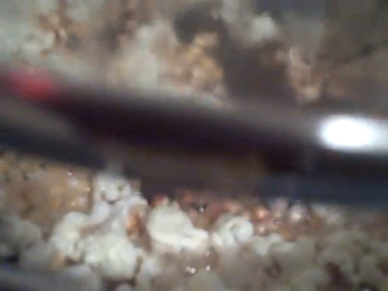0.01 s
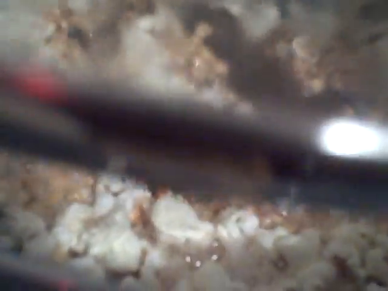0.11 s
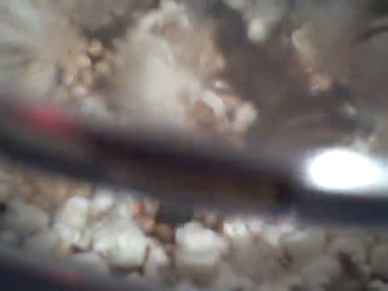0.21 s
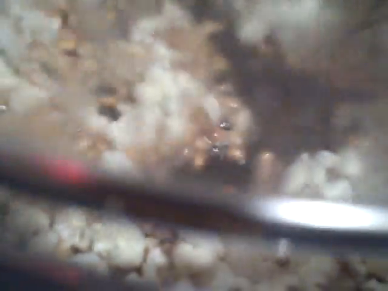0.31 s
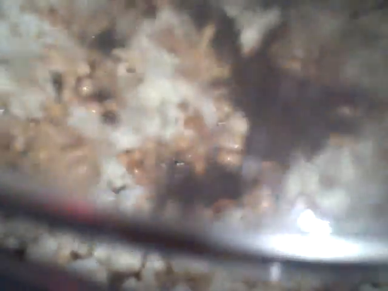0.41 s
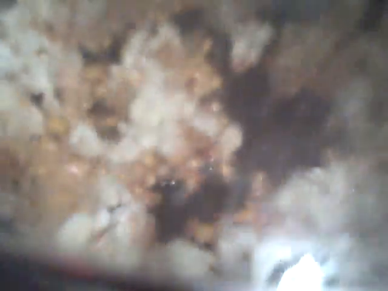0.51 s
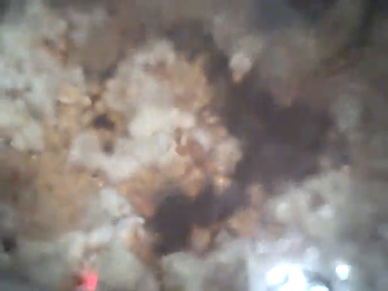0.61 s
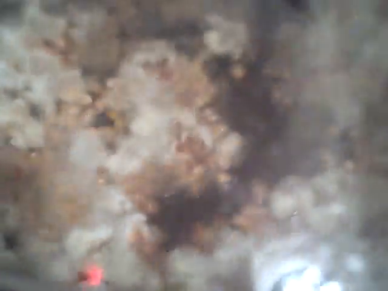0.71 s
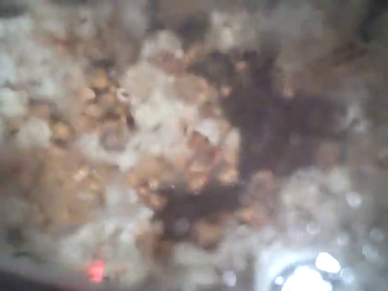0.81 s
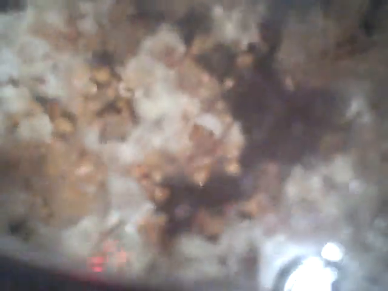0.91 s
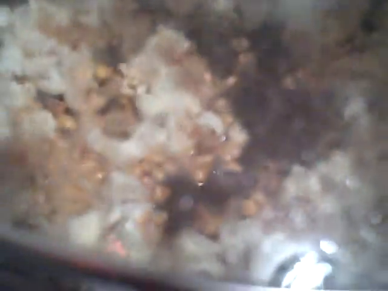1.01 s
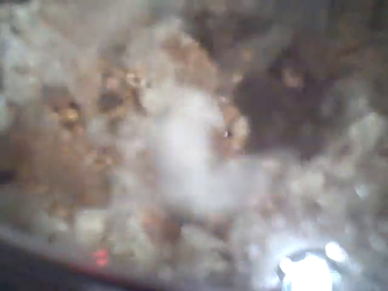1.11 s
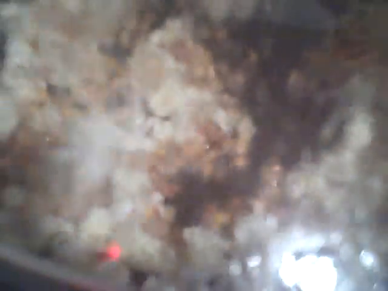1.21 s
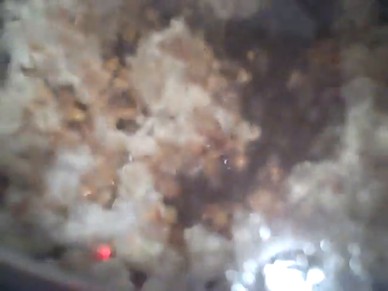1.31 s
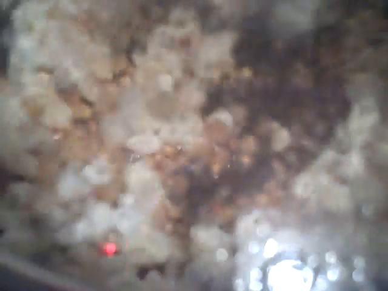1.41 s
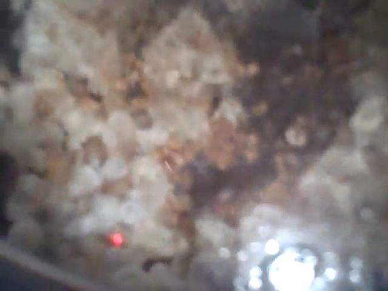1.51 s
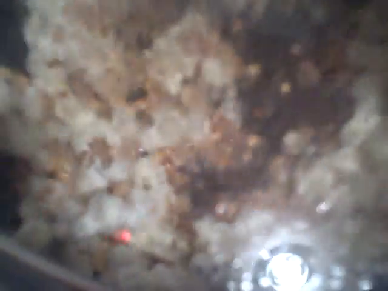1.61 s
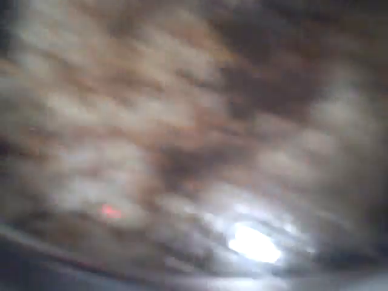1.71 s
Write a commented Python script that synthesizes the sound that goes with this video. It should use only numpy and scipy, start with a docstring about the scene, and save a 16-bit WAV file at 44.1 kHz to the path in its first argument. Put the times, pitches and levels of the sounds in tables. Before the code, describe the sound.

Popcorn pops in a metal pan, very close: faint sizzle and light ticks, two loud thumping pops, a lull, more pops with kernels pinging on metal, then lid knocks and rattle, in a small kitchen.

```python
"""A faint sizzle of oil and a few light ticks of kernels on metal come first, then popcorn bursts in a pan.
Close to the microphone, each pop sums a swinging thump, noise bursts for hull and steam, and ringing modes.
Flung kernels tick on the pan as short noise bands with a ring; after the last pop the lid knocks and rattles.
Behind them a hum falls in pitch, filtered noise makes sizzle and rumble, and the kitchen adds a short tail.
The microphone overloads on the loudest pops and loses the extreme top."""
import sys
import numpy as np
from scipy import signal
from scipy.fft import rfft, irfft
from scipy.io import wavfile

SR = 44100
rng = np.random.default_rng(int(sys.argv[2]) if len(sys.argv) > 2 else 0)


def materialize(psi):
    """Save the field psi as 16-bit PCM at rate SR to the path in sys.argv[1].

    A 1-D psi becomes a single channel; in a 2-D psi each row is a channel.
    """
    bounded = np.clip(np.atleast_2d(psi).T, -1, 1)
    quanta = np.round(bounded * 32767).astype(np.int16)
    wavfile.write(sys.argv[1], SR, quanta)


N = 79380
T = np.arange(N) / SR


def amp(db):
    """Decibels to gain."""
    return 10 ** (np.asarray(db) / 20)


def fade(t60):
    """Exponential decay by 60 dB in t60 seconds."""
    return np.exp(-np.log(1000) * T / t60)


def add(out, start_s, x):
    """Mix x into out from start_s on."""
    i = int(np.clip(start_s * SR, 0, N - 1))
    out[i:] += x[:N - i]


def pulse(width_s):
    """A push that peaks early, then swings back through zero."""
    t = T / width_s
    return t * np.exp(1 - t) * (1 - t / 2)


CLICK_RISE_S = 0.0002
CONTACT_DB, CONTACT_S = -2.5, 0.00031  # the hard first instant of a click


def burst(hz, octaves, t60):
    """A band of noise that starts sharply and dies away, levelled to a set energy for its t60."""
    edges = hz * 2 ** (np.array([-.5, .5]) * octaves)
    edges = np.clip(edges, [20, 40], [15000, 20000])
    sos = signal.butter(2, edges, "band", fs=SR, output="sos")
    shape = fade(t60) + amp(CONTACT_DB) * np.exp(-T / CONTACT_S)
    shape *= 1 - np.exp(-T / CLICK_RISE_S)
    x = signal.sosfilt(sos, rng.standard_normal(N) * (shape + 1e-12))
    return x * np.sqrt(2 * np.sum(fade(t60) ** 2) / np.sum(x ** 2))


def treble(t60):
    """The bright spray on top of a click: noise two octaves wide."""
    return burst(6900 * np.sqrt(2), 2, t60)


RING_OCTAVES = 0.22
SPLIT_HZ, TWIN_DB = 6.5, -6  # typical (random) distance and the level of each mode's close twin


def ring(modes, hz=None, octaves=RING_OCTAVES):
    """Half a second of decaying, beating modes, mixed anew by each blow; those near hz are favoured."""
    out, t = np.zeros(N), T[:SR // 2]
    draws = rng.standard_normal((len(modes), 4))
    for (f, db, t60), (size_db, phase, split, twin_phase) in zip(modes, draws):
        weight = 1 if hz is None else 1 / np.hypot(1, np.log2(f / hz) / octaves)
        main = np.sin(2 * np.pi * (f * t + phase))
        twin = amp(TWIN_DB) * np.sin(2 * np.pi * ((f + SPLIT_HZ * split) * t + twin_phase))
        decay = np.exp(-np.log(1000) * t / t60)
        out[:len(t)] += weight * amp(db + size_db) * (main + twin) * decay
    return out


RUMBLE_DB, RUMBLE_HZ = -57.5, 113


def rumble():
    """Low steady noise of the kitchen: noise kept below a corner frequency."""
    x = signal.sosfilt(signal.butter(2, RUMBLE_HZ, fs=SR, output="sos"), rng.standard_normal(N))
    return amp(RUMBLE_DB) * x / x.std()


ROOM_DB, ROOM_T60_S, ROOM_TOP_HZ = -21, 0.37, 8100


def kitchen(x):
    """The short, slightly dull room tail: convolution with dying noise."""
    soft = signal.butter(1, ROOM_TOP_HZ, fs=SR)
    tail = signal.lfilter(*soft, rng.standard_normal(N))
    tail *= fade(ROOM_T60_S) * (1 - np.exp(-T / 0.0015))
    return signal.fftconvolve(x, tail / np.sqrt(np.sum(tail ** 2)))[:N]


# colour of the sizzle and kitchen air: (frequency [Hz], relative level [dB per Hz])
AIR_COLOUR = [(30, -1.5), (80, -1), (180, -17), (360, -1.5), (650, -14), (2000, -10.5), (5500, -13.5),
              (10000, -19.5), (16000, -14.5)]
# level of the sizzle: (time [s], level [dB])
SIZZLE_LEVEL = [(0, -44), (.15, -47), (.6, -53), (.73, -51), (1.05, -48.5), (1.6, -50), (1.8, -59.5)]
SPIT_PER_S, SPIT_HZ, SPIT_T60_S = 70, 8000, .012
SPIT_DB, SPIT_SPREAD_DB = -5, 4  # smallest spit relative to the hiss, and the scale of its random excess


def sizzle():
    """Hot oil, faint in the pan: coloured noise with tiny spits at random times."""
    hz, db = np.array(AIR_COLOUR).T
    bins_hz = np.arange(N // 2 + 1) * SR / N
    colour = amp(np.interp(np.log(bins_hz + 1), np.log(hz), db))
    hiss = irfft(rfft(rng.standard_normal(N)) * colour, N)
    spits = np.zeros(N)
    for place, size, pitch in rng.random((int(SPIT_PER_S * N / SR), 3)):
        spit = burst(SPIT_HZ * 2 ** (pitch - .5), 1.4, SPIT_T60_S)
        excess_db = SPIT_SPREAD_DB * min(-np.log(1 - size), 3)
        add(spits, place * N / SR, amp(SPIT_DB + excess_db) * spit)
    times, level_db = np.array(SIZZLE_LEVEL).T
    return amp(np.interp(T, times, level_db)) * (hiss / hiss.std() + spits)


# the air in the pan, falling in pitch: (time [s], frequency [Hz], hum level relative to the thumps [dB])
AIR_IN_PAN = [(0.398, 373, -37.5), (1.198, 340.7, -31), (1.381, 299.2, -10.5), (1.551, 160, -20)]
HUM_T60_S, HUM_WIDTH_HZ = 0.4, 21


def hum():
    """An uneven hum lingers after each pop: slow noise carried on the pitch of the air in the pan."""
    times, hz, db = np.array(AIR_IN_PAN).T
    power = np.zeros(N)
    for start_s, thump_db, *_ in BURSTS:
        add(power, start_s, (amp(thump_db) * fade(HUM_T60_S)) ** 2)
    slow = signal.butter(2, HUM_WIDTH_HZ, fs=SR, output="sos")
    a, b = signal.sosfilt(slow, rng.standard_normal((2, N)))
    phase = 2 * np.pi * np.cumsum(np.interp(T, times, hz)) / SR
    wander = (a * np.cos(phase) + b * np.sin(phase)) / a.std()
    return np.sqrt(power) * amp(np.interp(T, times, db)) * wander


RATTLE_HZ, RATTLE_T60_S = 560, .15
RATTLE_GRAIN_S, RATTLE_GRAIN_DB = 0.0036, 9


def rattle():
    """Loose corn jolted by a knock: low noise in short uneven grains."""
    sizes = amp(RATTLE_GRAIN_DB * np.clip(rng.standard_normal(N), -2, 2))
    grain = (T / RATTLE_GRAIN_S).astype(int)
    return burst(RATTLE_HZ, 3.13, RATTLE_T60_S) * sizes[grain]


BOOM_T60_S, BOOM_RISE_S = 0.078, 0.0021
BOOM_NOISE_DB, BOOM_NOISE_RATIO, BOOM_NOISE_T60_S = -15, 0.87, .2


def boom(hz):
    """The low note of a knock: a decaying sine with noise just below it."""
    x = np.sin(2 * np.pi * hz * T) * fade(BOOM_T60_S)
    x += amp(BOOM_NOISE_DB) * burst(hz * BOOM_NOISE_RATIO, 1.5, BOOM_NOISE_T60_S)
    return x * (1 - np.exp(-T / BOOM_RISE_S))


# modes of the lid: (frequency [Hz], level [dB], t60 before any damping by hand [s])
LID_RESONANCES = [(722, 3, 0.09), (806, -5.5, 0.77), (1084, 6, 0.015), (1266, -15, 0.6), (1396, -9, 0.27),
                  (1765, -6.5, 0.19), (2090, -10, 0.16), (3220, 1, 0.045), (3880, 2, 0.06)]
# kernels glancing off the lid: (time [s], lid ring level [dB], favoured frequency [Hz])
LID_TOUCHES = [(.7694, -37.5, 820), (.8955, -24, 1370), (1.1592, -30, 829), (1.31, -23.5, 1274)]
# lid knocks: (time [s], clank level [dB], clank frequency [Hz], boom level [dB], boom frequency [Hz],
#   lid ring level [dB])
LID_KNOCKS = [(1.3793, -19, 1800, -13.5, 311, -22.5), (1.4838, -27, 2530, -14.5, 233, -30),
              (1.5195, -16, 1620, -17, 152, -31.5), (1.5325, -24, 1570, -21, 202, -38),
              (1.5495, -29, 1360, -28, 152, -38), (1.578, -45, 980, -27.5, 140, -65)]
TAP_OCTAVES, LID_HELD_T60_S = 0.071, 0.44  # a tap wakes few modes; the hand damps the lid while it knocks
CLANK_T60_S, CLANK_OCTAVES = 0.03, 2.1
CLANK_TREBLE_DB, SNAP_DB, SNAP_S, RATTLE_DB = -28, 15, 0.0002, -16  # levels relative to the clank


def lid():
    """The lid rings when kernels touch it, then knocks with a snap, a clank, a boom and a rattle."""
    out, snap = np.zeros(N), -pulse(SNAP_S)
    for start_s, db, hz in LID_TOUCHES:
        add(out, start_s, amp(db) * ring(LID_RESONANCES, hz, TAP_OCTAVES))
    for start_s, clank_db, hz, boom_db, boom_hz, ring_db in LID_KNOCKS:
        clank = burst(hz, CLANK_OCTAVES, CLANK_T60_S)
        clank += amp(CLANK_TREBLE_DB) * treble(CLANK_T60_S)
        clank += amp(SNAP_DB) * snap + amp(RATTLE_DB) * rattle()
        metal = fade(LID_HELD_T60_S) * ring(LID_RESONANCES, hz, octaves=1.6)
        add(out, start_s, amp(clank_db) * clank + amp(boom_db) * boom(boom_hz) + amp(ring_db) * metal)
    return out


# modes of the pan: (frequency [Hz], ring level [dB], t60 before the corn damps it [s])
PAN_RESONANCES = [(1146.6, -1, 0.43), (1706, -9.5, 0.065), (1780, -2.5, 0.14), (2179, -3, 0.12),
                  (2813, -13.5, 0.08), (2876, -2.5, 0.07), (3153, -11.5, 0.09), (3433, -6.5, .089),
                  (4130, -5.5, .055), (4900, -13.5, 0.42), (5285, -8, 0.088), (5850, -10, 0.075)]
RING_DAMP_T60_S, RING_FREE_DB = 0.082, -24  # the corn soaks up most of the ring; a little stays free


def pan_ring(hz):
    """The metal of the pan rings, quickly damped by the corn."""
    return (fade(RING_DAMP_T60_S) + amp(RING_FREE_DB)) * ring(PAN_RESONANCES, hz)


BODY_DB, BODY_DRY_DB, BODY_WIDTH_HZ = -5.5, -0.5, 103


def body(x):
    """Clicks are heard through the pan: equal resonant peaks at its modes, beside the plain click."""
    peaks = sum(signal.lfilter(*signal.iirpeak(f, f / BODY_WIDTH_HZ, fs=SR), x) for f, _, _ in PAN_RESONANCES)
    return amp(BODY_DRY_DB) * x + amp(BODY_DB) * peaks


THUMP_RISE_S, THUMP_T60_S = 0.001, 0.048
THUD_DB, THUD_RATIO, THUD_T60_S = -14.5, 0.821, 0.051  # a lower swing under the thump
HOLLOW_DB, HOLLOW_HZ = -24, 860  # the hollow knock within each thump
PUFF_DB, PUFF_S = -8.5, 0.00069  # the push of steam under each thump


def thump(hz):
    """A push of steam sets the air in the pan swinging for a few cycles, with a hollow knock."""
    swing = np.sin(2 * np.pi * hz * T) * fade(THUMP_T60_S)
    swing += amp(THUD_DB) * np.sin(2 * np.pi * hz * THUD_RATIO * T) * fade(THUD_T60_S)
    swing *= 1 - np.exp(-(T / THUMP_RISE_S) ** 2)
    hollow = burst(HOLLOW_HZ, 0.68, THUMP_T60_S)
    return -swing + amp(HOLLOW_DB) * hollow - amp(PUFF_DB) * pulse(PUFF_S)


# kernels hitting the pan: (time [s], tick level [dB], tick frequency [Hz], tick width [octaves],
#   treble level [dB], t60 [s], pan ring level [dB], favoured ring frequency [Hz], thud level [dB])
KERNEL_HITS = [(.061, -35, 4360, 1.5, -42, 0.0095, -47, 2200, -54.5),
               (.191, -25, 3100, 2.35, -50, 0.051, -28, 2230, -28.5),
               (.199, -21.5, 2130, 0.79, -29.5, 0.042, -20, 1840, -20.5),
               (0.2494, -21, 3850, 1.3, -28.5, 0.031, -13.5, 4230, -20),
               (.271, -21, 3800, 6.8, -36, 0.026, -22.5, 1800, -31),
               (0.2738, -11.5, 4350, 1.06, -32, 0.0089, -40, 4250, -34),
               (.365, -44, 5000, 1.1, -54, 0.052, -67, 2900, -47),
               (.409, -18.5, 4000, 2.6, -47, 0.063, -19.5, 2800, -38),
               (.412, -18.5, 6200, 0.36, -21, 0.018, -14, 5950, -57),
               (.428, -21, 3500, 1.2, -22, 0.025, -18, 1860, -21.5),
               (.553, -41.5, 7900, .54, -68, 0.063, -56, 5700, -59),
               (0.564, -40, 5770, 0.39, -56.5, 0.035, -73.5, 5700, -100),
               (0.583, -42.5, 5520, 0.35, -45, 0.085, -69, 5306, -83),
               (.663, -49, 6040, 0.92, -46, .05, -70, 5580, -64),
               (0.7691, -10, 4020, 1.57, -16.5, 0.046, -11, 2120, -11),
               (.796, -22.5, 5200, .3, -29, .03, -12, 5350, -26.5),
               (.8839, -27, 4020, 0.92, -42, .028, -20.5, 4000, -45),
               (.8954, -22, 2870, 1.7, -47, 0.056, -31, 2220, -50),
               (.947, -37, 3980, 3, -39, 0.043, -40, 2900, -26),
               (.969, -26.5, 5600, 0.87, -42, 0.015, -53, 5700, -28),
               (1.005, -59, 4440, 1.7, -55, 0.029, -61, 4200, -28),
               (1.1593, -24, 4540, 1.2, -48.5, 0.013, -17.5, 3950, -23.5),
               (1.234, -35, 7300, 0.45, -36, 0.082, -22.5, 4660, -53),
               (1.2551, -20.5, 3520, 2.7, -21.5, 0.015, -18.5, 1130, -61),
               (1.2585, -23, 3960, 1.3, -27, 0.021, -15.5, 2230, -51),
               (1.267, -24, 3300, 3.4, -31.5, 0.064, -23, 4070, -24),
               (1.287, -27, 5160, 1.5, -21.5, .019, -20.5, 4070, -27.5),
               (1.3286, -27, 4400, 1.7, -51, 0.057, -21.5, 4930, -32),
               (1.3301, -20.5, 7700, .26, -48, 0.01, -40, 5700, -48),
               (1.5988, -22, 4080, 0.93, -40.5, 0.031, -25.5, 4050, -54),
               (1.688, -39, 6410, 0.91, -59, .036, -36.5, 4840, -40)]


def ticks():
    """Flung kernels strike the pan: a hard tick, a short ring and a small thud at the pitch of its air."""
    out, clicks = np.zeros(N), np.zeros(N)
    times, air_hz, _ = np.array(AIR_IN_PAN).T
    for start_s, db, hz, octaves, treble_db, t60, ring_db, ring_hz, thud_db in KERNEL_HITS:
        add(clicks, start_s, amp(db) * burst(hz, octaves, t60))
        spray = amp(treble_db) * treble(t60)
        metal = amp(ring_db) * pan_ring(ring_hz)
        thud = amp(thud_db) * thump(np.interp(start_s, times, air_hz))
        add(out, start_s, spray + metal + thud)
    return out + body(clicks)


# short resonances of the corn-filled pan, the bark of each burst: (frequency [Hz], level [dB], t60 [s])
BARK_RESONANCES = [(2705, -2, 0.021), (3000, 3, 0.025), (3295, -10.5, 0.021), (3472, -1, 0.039),
                   (4050, -10.5, 0.11), (5040, -14, 0.017)]
# bursts: (time [s], thump level [dB], thump frequency [Hz], crack level [dB], crack frequency [Hz],
#   bark level [dB], favoured bark frequency [Hz], steam hiss level [dB], pan ring level [dB],
#   favoured ring frequency [Hz])
BURSTS = [(0.3275, 3, 369.4, -14, 2530, -12.5, 2700, -15.5, -16, 1260),
          (0.4018, -2.5, 375, -17, 3660, -10, 2830, -21.5, -20.5, 2200),
          (0.7557, -3, 357, -19, 4300, -11.5, 2980, -16, -17.5, 1200),
          (0.9234, -12.5, 353, -24, 3300, -10.5, 3010, -28, -13.5, 1900),
          (1.1193, -6.5, 349, -19.5, 4550, -15.5, 4500, -42.5, -18, 1400),
          (1.2002, -8, 349, -14, 4650, -14, 3150, -23.5, -15.5, 1710),
          (1.25, -13, 333, -19.5, 3150, -15.5, 3600, -35, -23, 1210)]
CRACK_LAG_S, CRACK_T60_S, CRACK_OCTAVES, BARK_OCTAVES = .0007, 0.029, 1.34, 0.12


def pops():
    """Bursting kernels: a thump, then at once the hull crack, bark, steam hiss and ringing pan."""
    out, cracks = np.zeros(N), np.zeros(N)
    for start_s, thump_db, thump_hz, crack_db, crack_hz, bark_db, bark_hz, hiss_db, ring_db, ring_hz in BURSTS:
        add(out, start_s, amp(thump_db) * thump(thump_hz))
        crack_s = start_s + CRACK_LAG_S
        add(cracks, crack_s, amp(crack_db) * burst(crack_hz, CRACK_OCTAVES, CRACK_T60_S))
        bark = amp(bark_db) * ring(BARK_RESONANCES, bark_hz, BARK_OCTAVES)
        metal = amp(ring_db) * pan_ring(ring_hz)
        hiss = amp(hiss_db) * treble(CRACK_T60_S)
        add(out, crack_s, bark + metal + hiss)
    return out + body(cracks)


LOW_CUT_HZ = 12


def scene():
    """Pops, ticks and lid close by, with the kitchen's tail, over the sizzle and rumble."""
    pan = pops() + hum() + ticks() + lid()
    pan = signal.lfilter(*signal.butter(1, LOW_CUT_HZ, "high", fs=SR), pan)
    return (pan + amp(ROOM_DB) * kitchen(pan) + sizzle() + rumble())[None]


CUT_HZ = 15850


def record(dry):
    """The microphone clips the loudest pops and cuts the top."""
    clipped = np.clip(dry, -1, 1)
    return signal.sosfilt(signal.ellip(8, .2, 70, CUT_HZ, fs=SR, output="sos"), clipped)


dry = scene()
out = record(dry)
materialize(out)
```